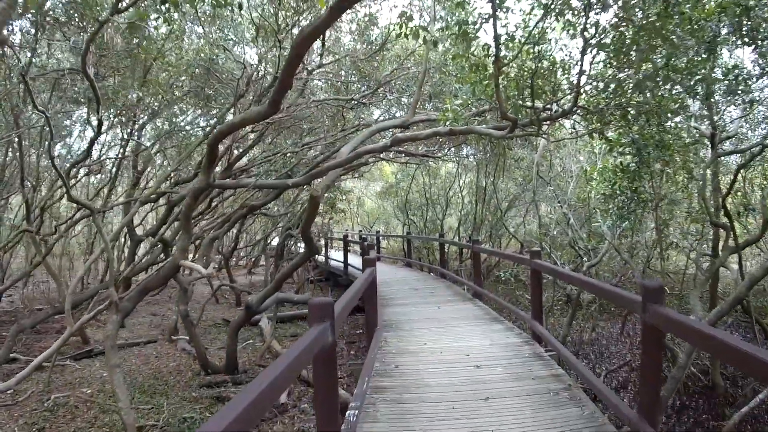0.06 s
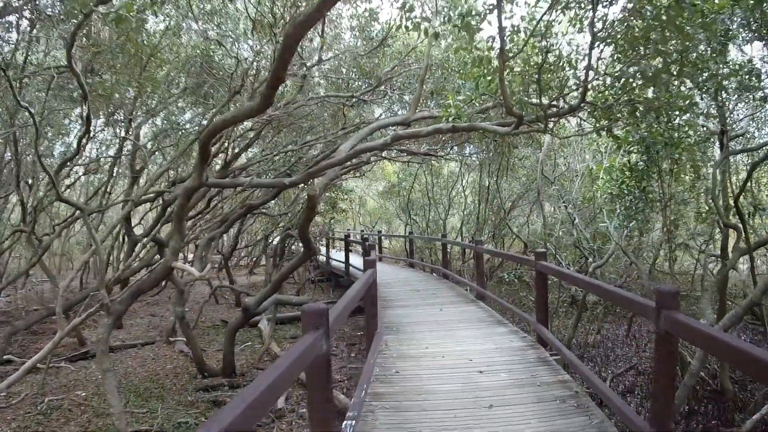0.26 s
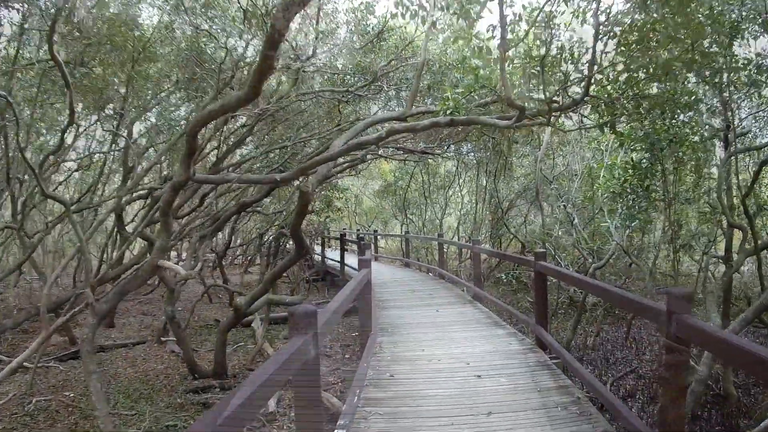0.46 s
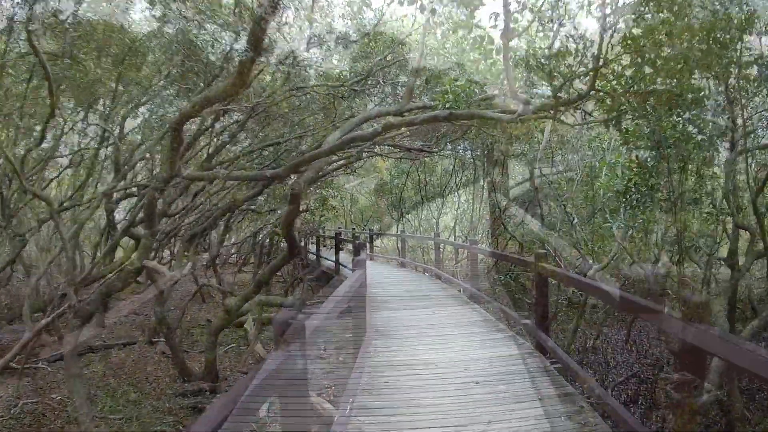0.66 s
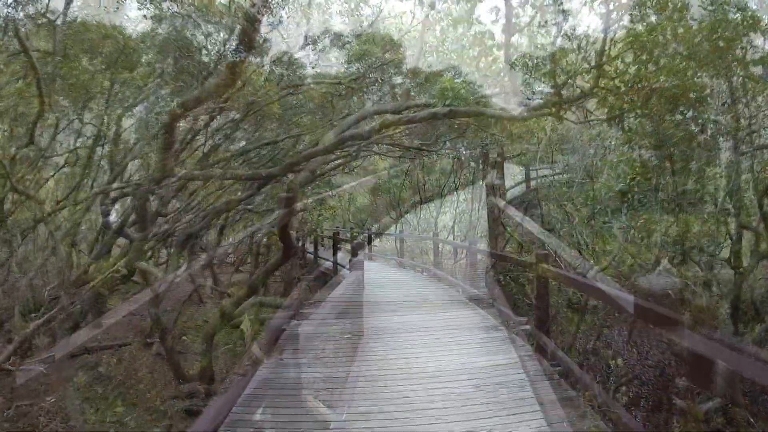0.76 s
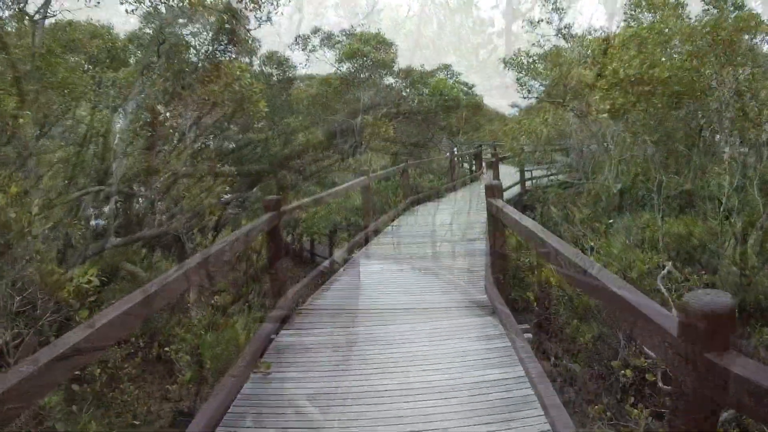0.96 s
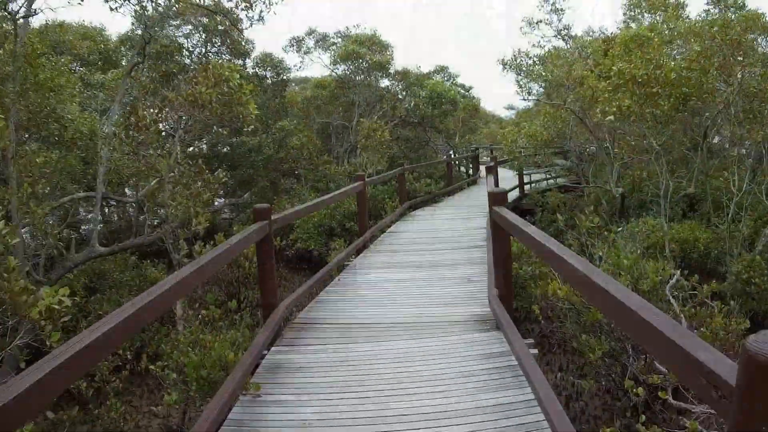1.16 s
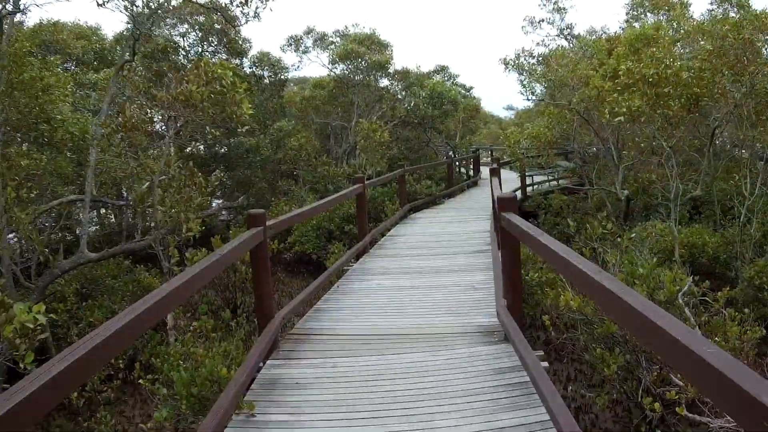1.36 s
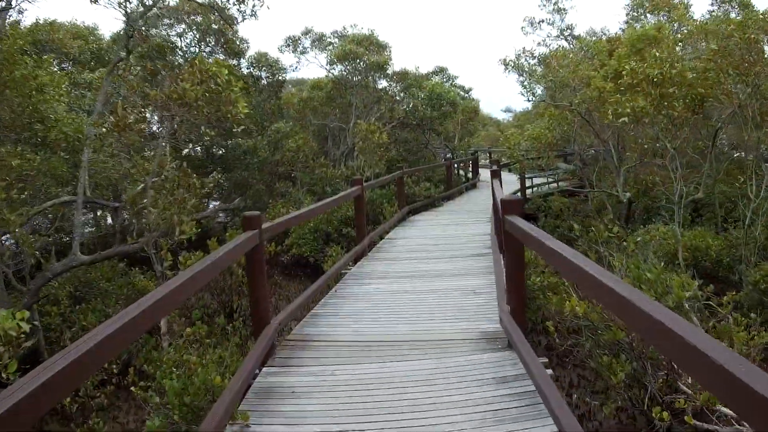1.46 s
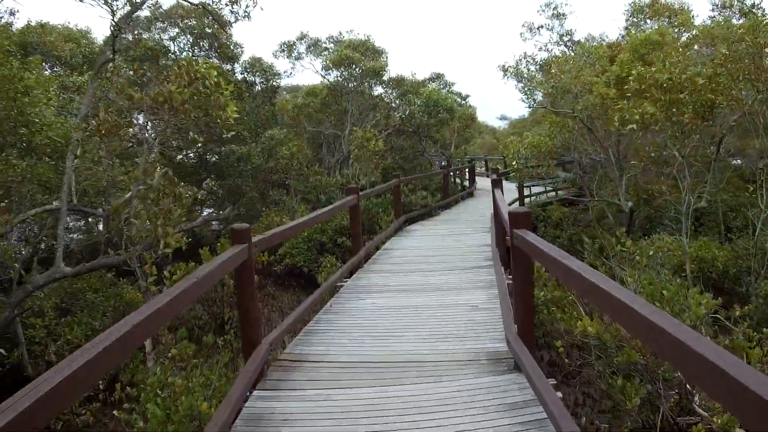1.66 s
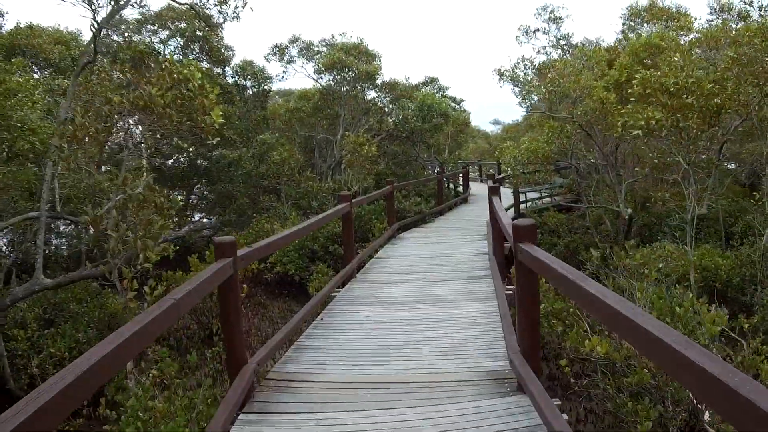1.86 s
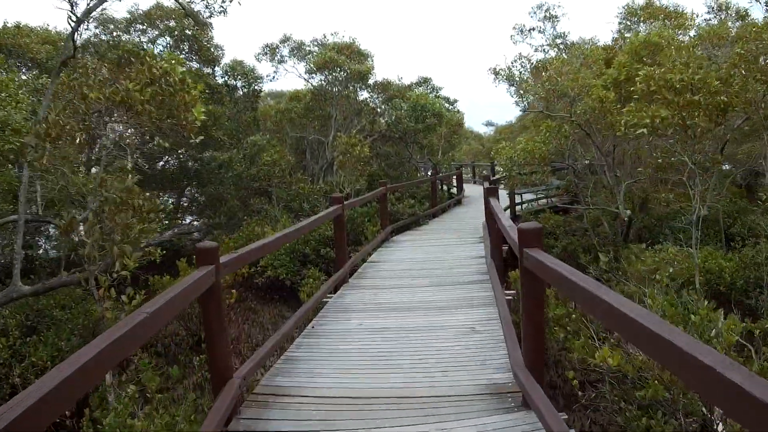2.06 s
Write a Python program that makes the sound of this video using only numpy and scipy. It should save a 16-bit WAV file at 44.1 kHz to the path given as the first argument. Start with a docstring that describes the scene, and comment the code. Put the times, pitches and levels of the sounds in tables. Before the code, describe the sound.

Shoes walking on timber planks, light then firmer, above a deep swelling rumble and distant bird whistles

```python
"""Soft footsteps on a timber boardwalk among trees, over a low rumble and a faint hiss.
Heels knock the planks (short pushes and ringing tones), soles scuff (grainy noise), grit and joints
tick (tiny bands of noise), one plank groans and a loose board clacks (fading tones).
The rumble (shaped noise and a drone) swells halfway through. Far birds whistle in gliding tones, and
one calls in a blurred band of noise. The trees answer steps and birds with a fading echo."""
import sys
import numpy as np
from scipy import signal
from scipy.fft import rfft, irfft, next_fast_len
from scipy.io import wavfile
from scipy.ndimage import map_coordinates

SR = 44100
rng = np.random.default_rng(int(sys.argv[2]) if len(sys.argv) > 2 else 0)


def wav_out(sig):
    """Save sig, one row per channel (or a flat mono array), as 16-bit PCM at SR to the path in sys.argv[1]."""
    wavfile.write(sys.argv[1], SR, np.round(np.clip(np.atleast_2d(sig).T, -1, 1) * 32767).astype(np.int16))


N = 92565  # length of the scene in samples


def amp(db):
    """Turn decibels into a plain multiplier."""
    return 10 ** (np.asarray(db) / 20)


def unit(x):
    """Scale a sound to an average (rms) level of 1."""
    return x / np.sqrt(np.mean(x ** 2) + 1e-20)


def along(points, hz):
    """Read a value at each frequency from (Hz, value) points on a log axis."""
    point_hz, values = np.transpose(points)
    return np.interp(np.log(hz + 1), np.log(point_hz + 1), values)


def curve(rows):
    """Draw straight lines through (seconds, value) rows, one value per sample."""
    return np.interp(np.arange(N) / SR, *np.transpose(rows))


def wobble(rate):
    """A smooth random curve through 'rate' random points a second."""
    points = rng.standard_normal(int(N * rate / SR) + 4)
    return map_coordinates(points, [np.arange(N) * rate / SR])


def filtered(x, response):
    """Multiply each frequency of a sound by response(Hz)."""
    size = next_fast_len(N + 8192)
    hz = np.fft.rfftfreq(size, 1 / SR)
    return irfft(rfft(x, size) * response(hz), size)[:N]


def noise(spectrum):
    """Random noise coloured by (Hz, dB) points, at an rms level of 1."""
    return unit(filtered(rng.standard_normal(N), lambda hz: amp(along(spectrum, hz))))


def add(track, start_s, sound):
    """Mix a sound into the track at a time in seconds."""
    part = track[max(round(start_s * SR), 0):][:len(sound)]
    part += sound[:len(part)]


# How the noise of the rumble is coloured. Each row: frequency in Hz, relative strength per Hz in dB.
RUMBLE_COLOUR = [(12, -17), (25, -6.5), (33, 0.5), (42, 2), (52, -0.5), (80, -1), (110, -7.5), (150, -28),
                 (300, -53)]
# The swell of the rumble, before the trims below. Each row: time in seconds, level in dB.
RUMBLE_SWELL = [(0, -50), (.15, -44.5), (.36, -46.5), (.46, -49), (.8, -50.5), (.96, -47), (1.15, -46),
                (1.22, -41), (1.4, -42), (1.6, -44), (1.69, -42), (1.82, -44.5), (2.1, -41.5)]
RUMBLE_NOISE_DB, DRONE_DB, DRONE_HZ = -1, -6.5, 42


def rumble(drone_wander_rad=0.97):
    """Low noise mixed with a deep tone that wavers because its phase wanders."""
    phase = 2 * np.pi * DRONE_HZ * np.arange(N) / SR + drone_wander_rad * wobble(8.22)
    drone = np.sqrt(2) * np.sin(phase)  # rms 1, like the noise
    mix = amp(RUMBLE_NOISE_DB) * noise(RUMBLE_COLOUR) + amp(DRONE_DB) * drone
    return amp(curve(RUMBLE_SWELL)) * mix


# The colour of the rumble's upper body. Each row: frequency in Hz, relative strength per Hz in dB.
BODY_COLOUR = [(60, -14.5), (120, 1.5), (215, -5), (300, -10.5), (450, -24.5), (700, -32), (1200, -32),
               (3000, -48)]
# Its loudness over time, before the trim below. Each row: time in seconds, level in dB.
BODY_SWELL = [(0, -57), (.44, -61), (.68, -55.5), (.85, -55), (1.05, -51.5), (1.28, -50), (1.5, -51),
              (1.65, -48), (1.75, -51.5), (1.86, -51.5), (2.1, -51.5)]


def rumble_body(trim_db=1.5, uneven_db=1.28):
    """The upper body of the rumble: noise whose level wavers at random."""
    level_db = curve(BODY_SWELL) + trim_db + uneven_db * wobble(13.9)
    return amp(level_db) * noise(BODY_COLOUR)


# The colour of the surge. Each row: frequency in Hz, relative strength per Hz in dB.
SURGE_COLOUR = [(120, -35), (230, -2.5), (330, 0.5), (450, -3.5), (650, -24), (1500, -42)]
# The rise and fall of the surge, before its wavering. Each row: time in seconds, level in dB.
SURGE_SWELL = [(.95, -76), (1.13, -62), (1.42, -58.5), (1.66, -60), (1.8, -86)]


def surge(uneven_db=3.0):
    """An uneven burst of low-mid noise while the rumble is high."""
    level_db = curve(SURGE_SWELL) + uneven_db * wobble(20)
    return amp(level_db) * noise(SURGE_COLOUR)


# The colour of the hiss. Each row: frequency in Hz, relative strength per Hz in dB.
HISS_COLOUR = [(200, 11.5), (600, 16.5), (1200, 9), (2200, 9), (3200, 9.5), (4500, 6.5), (6500, 2),
               (10000, 1), (15500, -1)]
# The loudness of the hiss, before the trim below. Each row: time in seconds, level in dB.
HISS_SWELL = [(0, -69.5), (.3, -71), (.6, -71.5), (.8, -73.5), (1.05, -71.5), (1.35, -72), (2.1, -71)]


def hiss(trim_db=6.5):
    """Faint wide-band noise with a slowly drifting level."""
    return amp(curve(HISS_SWELL) + trim_db) * noise(HISS_COLOUR)


# How long the echo lasts. Each row: frequency in Hz, time to fade by 60 dB in seconds.
TREE_FADES = [(200, 0.54), (2000, 0.5), (8000, 0.17)]


def trees(x):
    """Diffuse echo of rails and trunks: a noise tail whose treble dies first smears the sound."""
    hz, t, bands = signal.stft(rng.standard_normal(SR // 2), SR, nperseg=256)
    fade = amp(-60 * t / along(TREE_FADES, hz)[:, None])
    tail = signal.istft(bands * fade, SR, nperseg=256)[1]
    return signal.fftconvolve(x, tail / np.linalg.norm(tail))[:N]


# Bird whistles, before a slight flutter in level.
# Each row: start in seconds, length in seconds, level in dB, then start, middle and end pitch in Hz.
BIRD_WHISTLES = [(.725, 0.11, -73.5, 3316, 3365, 3360), (0.899, 0.095, -68, 3290, 3380, 3300),
                 (1.515, 0.053, -67, 3600, 3690, 3670), (1.612, 0.051, -68, 3500, 3400, 3250),
                 (1.655, 0.028, -61, 3170, 3010, 2870), (1.755, 0.056, -68, 3090, 3170, 3150),
                 (1.905, 0.096, -63, 2970, 3145, 2710), (2.069, .06, -62, 2760, 3030, 3000)]


def whistles(flutter_db=1.2):
    """Thin clean tones whose pitch arches smoothly through three values."""
    out = np.zeros(N)
    for start_s, length_s, db, *pitches in BIRD_WHISTLES:
        u = np.linspace(0, 1, int(length_s * SR))  # 0 to 1 through the whistle
        hz = np.polyval(np.polyfit([0, .5, 1], pitches, 2), u)
        swell = np.sqrt(np.abs(np.sin(np.pi * u)))
        add(out, start_s, amp(db) * swell * np.sin(2 * np.pi * np.cumsum(hz) / SR))
    return out * amp(flutter_db * wobble(50))


# The rise and fall of a far bird's long call. Each row: time in seconds, level in dB.
FAR_CALL_SWELL = [(1.2, -97), (1.29, -85), (1.45, -74), (1.57, -76), (1.65, -83)]


def far_call(pitch_hz=3670, spread_hz=120):
    """One long call blurred by distance: a narrow band of noise around one pitch."""
    def band(hz):
        return np.exp(-.5 * ((hz - pitch_hz) / spread_hz) ** 2)
    return amp(curve(FAR_CALL_SWELL)) * unit(filtered(rng.standard_normal(N), band))


def groan(centre_s=.402, width_s=0.014, level_db=-52, hz=438, overtone_hz=830, overtone_db=-13):
    """A plank flexes under the foot: one short hollow tone with an overtone."""
    t = np.arange(N) / SR - centre_s
    tone = np.sin(2 * np.pi * hz * t) + amp(overtone_db) * np.sin(2 * np.pi * overtone_hz * t)
    return amp(level_db) * np.exp(-(t / width_s) ** 2) * tone


# The colour of grit under a sole. Each row: frequency in Hz, relative strength per Hz in dB.
GRIT_COLOUR = [(200, -20), (500, 8.5), (1100, 8), (2000, -3), (3300, -0.5), (4800, -10.5), (7000, -13.5),
               (12000, -21)]
# Soles rubbing on the planks.
# Each row: start in seconds, level in dB, length in seconds, brightness in dB per octave.
SOLE_SCUFFS = [(0.019, -55.5, 0.037, -1.5), (0.39, -58, 0.016, -13), (0.482, -61.5, 0.026, 0.5),
               (0.597, -61, 0.041, 0.5), (.637, -63.5, 0.067, 1.5), (0.953, -61.5, 0.045, 1.5),
               (1.032, -63, 0.051, 1), (1.079, -60.5, 0.064, 0), (1.271, -64, 0.018, -5),
               (1.458, -66, 0.05, 2), (1.526, -59, 0.077, 2.5), (1.612, -57, 0.045, 0),
               (1.7, -59, 0.027, -2)]


def scuffs(peak_share=0.22):
    """Grainy friction that rises fast and fades, with its own brightness for each sole."""
    out, t = np.zeros(N), np.arange(SR // 4) / SR
    for start_s, db, length_s, tilt in SOLE_SCUFFS:
        u = t / (peak_share * length_s)  # reaches 1 at the loudest moment
        grains = amp(3.5 * wobble(900))
        colour = [(hz, level + tilt * np.log2(hz)) for hz, level in GRIT_COLOUR]
        rub = unit(grains * noise(colour))
        add(out, start_s, amp(db) * u * np.exp(1 - u) * rub[:len(t)])
    return out


# Dry clicks of grit and plank joints. Each row: start in seconds, level in dB, centre in Hz,
# width in octaves, time to fade by 60 dB in seconds.
GRIT_TICKS = [(0.0357, -51, 2020, 0.54, 0.018), (0.1501, -53.5, 3420, 0.22, 0.016),
              (0.485, -56.5, 1100, 0.7, 0.012), (0.6045, -48, 1800, 0.84, 0.0074),
              (.6060, -52, 1290, 0.16, 0.02), (0.6437, -45.5, 2400, 0.6, 0.0049),
              (0.6461, -48, 3300, 0.57, 0.0066), (.6460, -55, 3220, 0.061, 0.015),
              (.9190, -54.5, 3300, 0.18, .012), (0.9972, -44.5, 3140, 0.72, 0.0061),
              (1.1008, -42, 2650, 0.23, 0.0075), (1.1040, -47, 5460, 0.15, 0.0034),
              (1.1038, -48.5, 2160, 0.67, 0.0071), (1.1221, -40.5, 2390, 0.28, 0.0068),
              (1.4330, -55, 4600, 0.31, 0.0081), (1.5240, -45, 920, 0.11, .012),
              (1.6069, -40, 1250, 0.27, 0.0088), (1.608, -50.5, 2900, .6, 0.0089),
              (1.7027, -44, 2180, 0.43, 0.005), (1.7107, -52, 2070, 0.54, 0.008),
              (1.8580, -54.5, 4970, 0.31, 0.0071), (2.0430, -57, 1330, 0.12, 0.04)]


def ticks(rise_s=0.0002):
    """Each click rings for some milliseconds, spread over a band around its centre."""
    out, t = np.zeros(N), np.arange(2048) / SR
    grid_hz = np.fft.rfftfreq(len(t), 1 / SR) + 1  # 1 Hz up, to avoid the log of zero
    for start_s, db, hz, width, t60 in GRIT_TICKS:
        response = np.exp(-.5 * (np.log2(grid_hz / hz) / width) ** 2)
        band = irfft(rfft(rng.standard_normal(len(t))) * response)
        shape = amp(-60 * t / t60) * (1 - np.exp(-t / rise_s))
        click = shape * band
        # the click gets the same energy as its fading shape
        add(out, start_s, amp(db) * np.linalg.norm(shape) * click / np.linalg.norm(click))
    return out


# The tones of a loose board. Each row: pitch in Hz, level in dB, time to fade by 60 dB in seconds.
BOARD_TONES = [(1710, -43, 0.02), (1990, -50, 0.0074)]


def clack(start_s=1.6072):
    """A loose board clacks under a heel: a short hard note of fading tones."""
    out, t = np.zeros(N), np.arange(SR // 8) / SR
    note = sum(amp(db - 60 * t / t60) * np.sin(2 * np.pi * hz * t) for hz, db, t60 in BOARD_TONES)
    add(out, start_s, note)
    return out


# The tones a plank rings with, before a little random scatter in level.
# Each row: pitch in Hz, relative level in dB, time to fade by 60 dB in seconds.
PLANK_TONES = [(229, 7, 0.12), (288, -3, 0.12), (363.4, 3.5, 0.13), (414, -6, 0.069), (458.4, 8.5, 0.073),
               (536, -1, 0.097), (587, -7.5, 0.15), (676, -2, 0.069), (844, -34, .06), (1050, -23, 0.046),
               (1314, -13, 0.072), (1720, -15, 0.061)]
# Shoe contacts. Each row: start in seconds, level in dB, pitch of the push in Hz,
# plank ring in dB compared with the push (before the ring is halved).
SHOE_KNOCKS = [(.0290, -54, 860, -3), (.4675, -52, 560, -9), (.4850, -55, 420, -4),
               (0.555, -51.5, 910, -18), (0.5892, -55, 640, -7), (0.6425, -49.5, 470, -9.5),
               (0.9442, -48.5, 636, -5), (0.965, -54, 610, -9), (0.998, -50, 970, -17),
               (1.0288, -44.5, 805, -20), (1.0662, -51, 890, -4), (1.1002, -44, 1000, -12.5),
               (1.1690, -56, 615, -14), (1.2769, -44, 1020, -21), (1.2789, -46, 526, -16),
               (1.5236, -35, 568, -9), (1.5362, -42, 450, -9), (1.6062, -36, 430, -14),
               (2.0440, -51.5, 680, -11)]
CONTACT_CYCLES = 0.51  # cycles until the push is strongest; it then fades
CONTACT_RISE = 1.02  # higher starts more softly


def plank_ring(t, scatter_db=2):
    """A struck plank sounds many fading tones at once, each starting at a random phase."""
    ring = np.zeros(len(t))
    for hz, db, t60 in PLANK_TONES:
        level = amp(db + scatter_db * rng.normal() - 60 * t / t60)
        ring += level * np.sin(2 * np.pi * (hz * t + rng.random()))
    return ring


def knocks(ring_rise_s=0.0047):
    """Each contact is a push of about two cycles, and the plank rings briefly after it."""
    out, t = np.zeros(N), np.arange(SR // 4) / SR
    for start_s, db, hz, ring_db in SHOE_KNOCKS:
        u = t * hz / CONTACT_CYCLES
        push = (u * np.exp(1 - u)) ** CONTACT_RISE * np.sin(2 * np.pi * hz * t)
        ring = plank_ring(t) * (1 - np.exp(-t / ring_rise_s))
        add(out, start_s, amp(db) * (push + .5 * amp(ring_db) * ring))
    return out


def scene(step_echo_db=-15.5, bird_echo_db=-9):
    """The background, far birds and near steps, with the trees echoing birds and steps."""
    air = rumble() + rumble_body() + surge() + hiss()
    song = whistles() + far_call()
    steps = groan() + scuffs() + ticks() + clack() + knocks()
    echo = amp(bird_echo_db) * trees(song) + amp(step_echo_db) * trees(steps)
    return (air + song + steps + echo)[None]


def record(dry, top_hz=15606):
    """Remove everything from the band limit upward."""
    return filtered(dry[0], lambda hz: hz < top_hz)[None]


dry = scene()
out = record(dry)
wav_out(out)
```